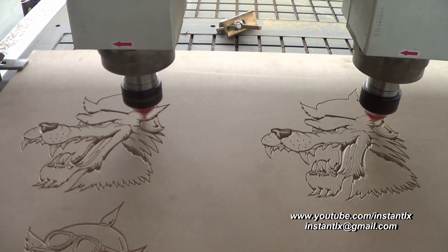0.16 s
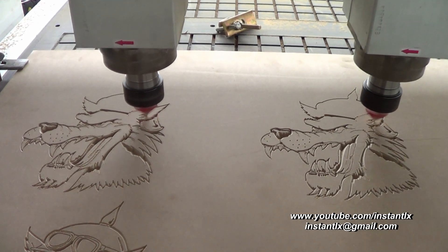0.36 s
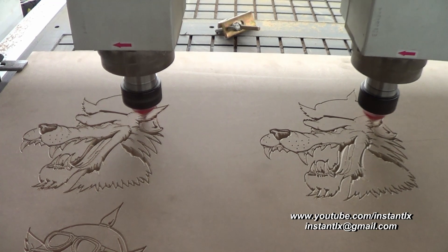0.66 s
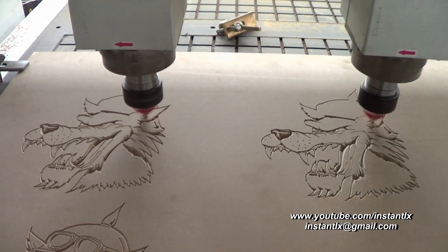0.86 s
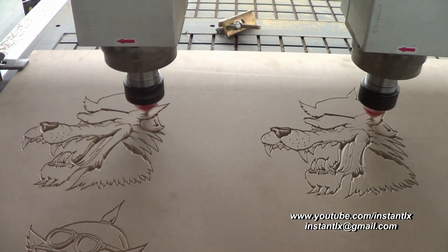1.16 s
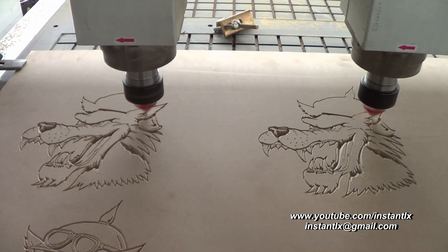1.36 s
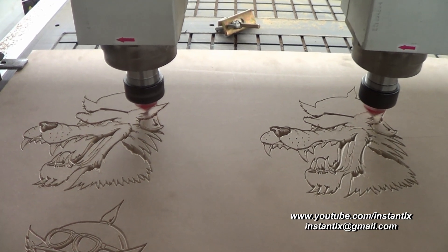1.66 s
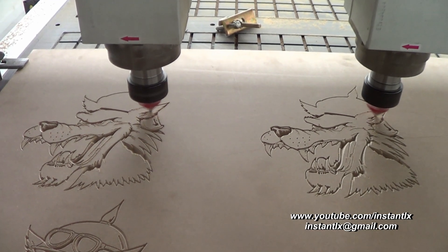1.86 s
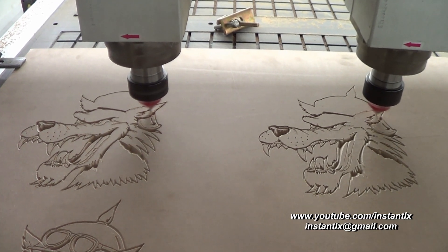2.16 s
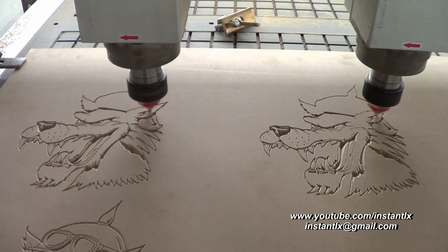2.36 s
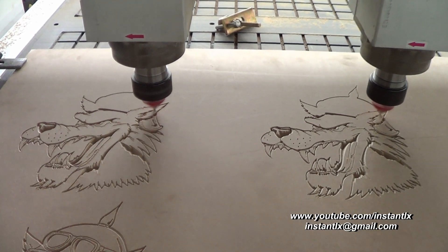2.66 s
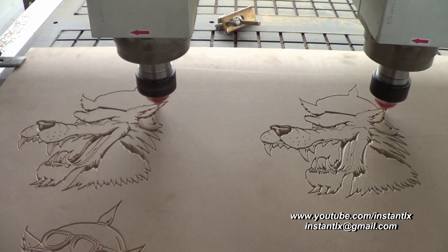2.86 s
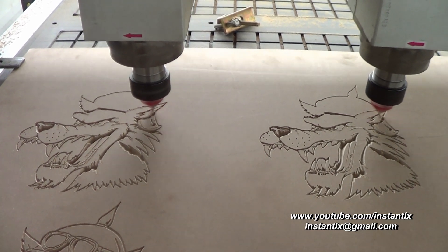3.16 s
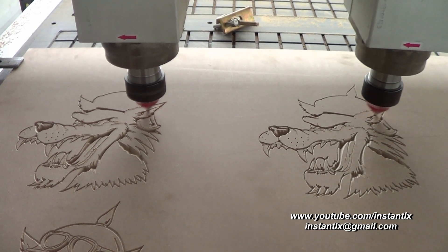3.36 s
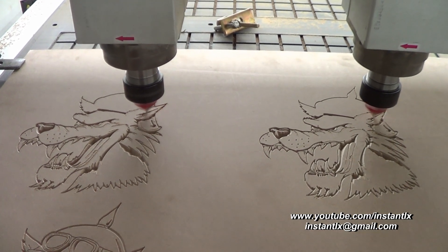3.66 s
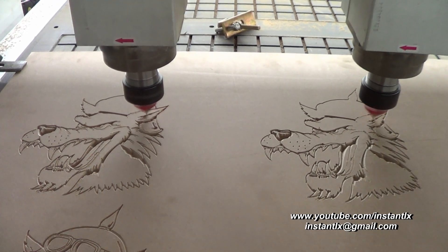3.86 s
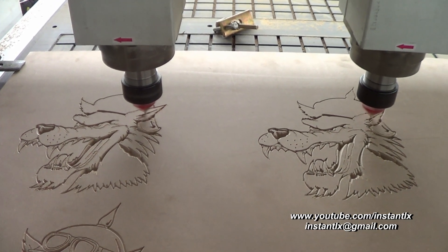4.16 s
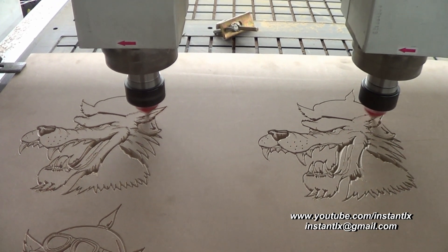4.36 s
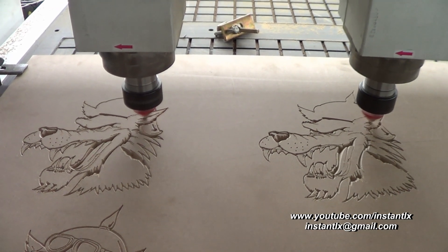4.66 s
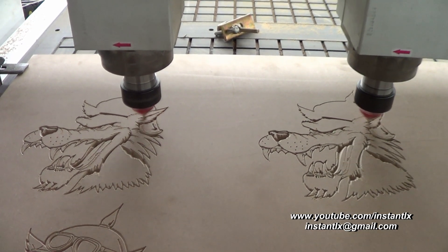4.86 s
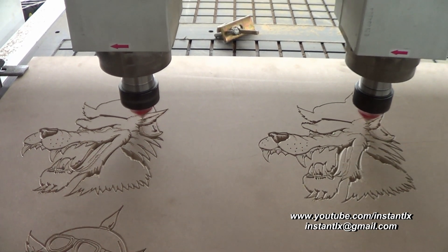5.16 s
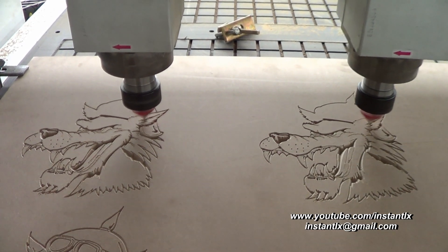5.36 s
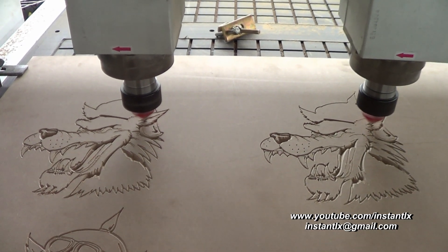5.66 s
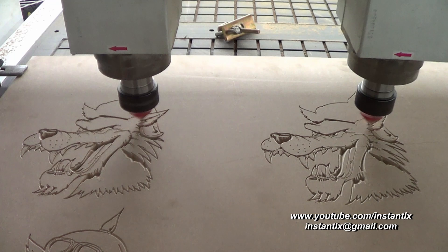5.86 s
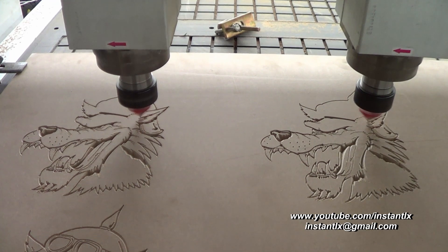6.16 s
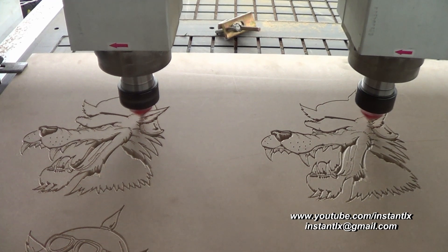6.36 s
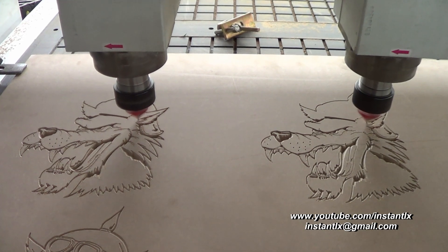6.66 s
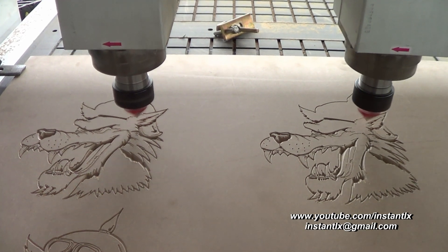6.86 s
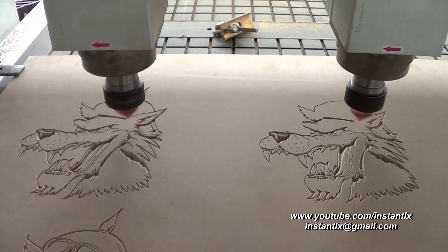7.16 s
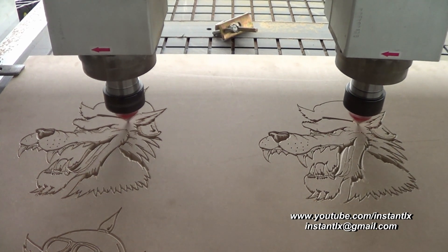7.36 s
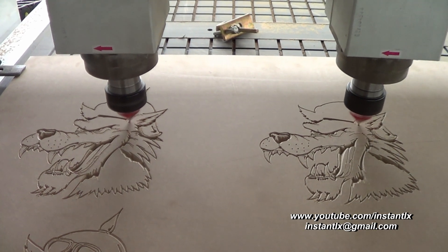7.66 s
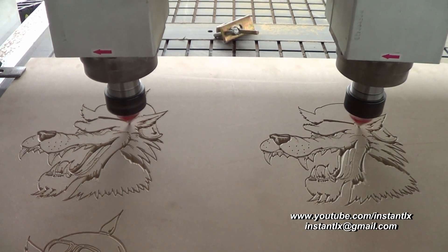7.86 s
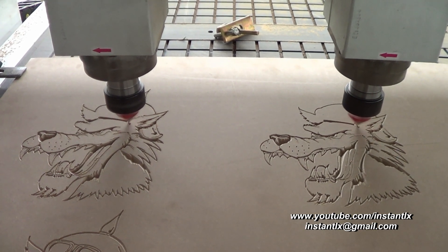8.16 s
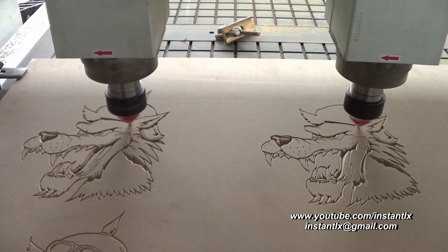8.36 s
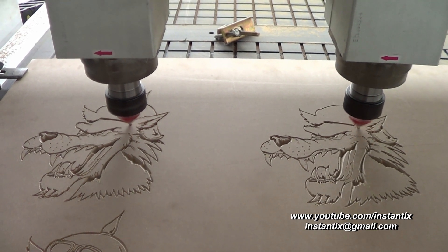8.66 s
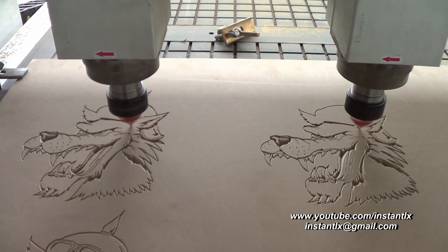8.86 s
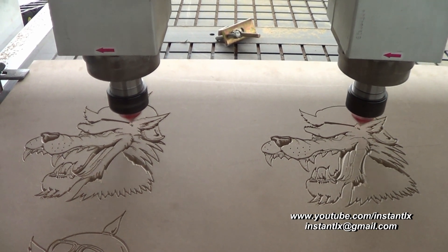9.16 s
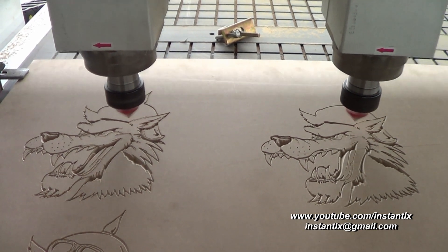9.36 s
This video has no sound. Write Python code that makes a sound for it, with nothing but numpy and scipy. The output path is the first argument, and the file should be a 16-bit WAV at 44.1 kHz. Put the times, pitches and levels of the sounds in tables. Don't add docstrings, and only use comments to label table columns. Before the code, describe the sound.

Steady loud airy rush from twin carving-machine spindles with wavering whine and faint low hum; the sound cuts out briefly near the start.

```python
import sys
import numpy as np
from scipy import signal
from scipy.fft import rfft, irfft
from scipy.io import wavfile
from scipy.ndimage import uniform_filter1d

SR = 44100
rng = np.random.default_rng(int(sys.argv[2]) if len(sys.argv) > 2 else 0)


def invert_db(x):
    u = np.asarray(x, float) / 20
    return 10 ** u


def store_pcm(level_fs):
    pcm = np.round(np.clip(level_fs, -1, 1) * 32767).astype(np.int16)
    wavfile.write(sys.argv[1], SR, np.atleast_2d(pcm).T)


N = 418950
T = np.arange(N) / SR
COARSE_T = T[::441]
HZ = np.fft.rfftfreq(2048, 1 / SR)
FRAMES = N // 512 + 5
FRAME_T = np.arange(FRAMES) * 512 / SR

SHAFTS_HZ = 299.76, 299.85
SLOT_HZ = 6595.16, 6596.98
DRIVE_HZ = 3400.14
SLOT_DB, DRIVE_DB = -39, -38.5
RUSH_DB, WASH_DB, HUM_DB = -16.5, -26, -46.0
IN_STEP_S = 5.19
GAP_S = .6195, 1.1735
CREEP_DB_PER_S, LEAN_DB_PER_S = -0.03, 0.12

# (frequency [Hz], density [dB/Hz])
BLOWER_SPECTRUM = [(20, -24), (60, -18), (100, -3), (122, 0), (133, -4), (146, -13), (172, -15), (197, -4),
                   (215, -13), (245, -9), (290, -14), (400, -40)]
# (middle [s], length [s], change [dB])
BLOWER_SURGES = [(.35, .3, 4), (2.45, .12, -5), (2.9, .15, -7), (3.22, .15, -5), (3.88, 0.21, -2),
                 (4.25, .45, 3), (4.7, .2, -4), (5.38, .22, 4), (5.9, .25, 1), (6.2, .15, 2),
                 (6.95, 0.24, 5), (7.42, .35, -4.5), (7.85, 0.46, 4), (8.65, .4, 4.5), (9.0, .15, -7),
                 (9.27, .2, 5)]
# (frequency [Hz], density [dB/Hz])
WASH_SPECTRUM = [(40, -34), (165, -23), (280, -14), (500, -4.5), (1200, 0), (2500, -0.5), (5000, 0),
                 (8000, -2), (9400, -7), (11000, -16)]
# (frequency [Hz], density [dB/Hz])
RUSH_SPECTRUM = [(40, -45.5), (165, -27), (270, -13), (400, -12.5), (490, -8.5), (1500, -5.5), (3000, -4),
                 (5500, -3), (7000, -4), (8200, -4.5), (9400, -11.5), (10300, -9), (11000, -16.5)]
# (centre [Hz], width [Hz], gain [dB])
HOUSING_BANDS = [(553, 87, 7.5), (716, 148, 8.5), (858, 113, 5), (1005, 155, 7), (1313, 100, -2),
                 (1617, 45, 4.5), (1790, 160, 6), (2126, 53, 5), (2187, 130, 1), (2417, 215, 8),
                 (3093, 303, 8), (3360, 120, 5), (3736, 440, 3.5), (4680, 540, 6), (7080, 350, 2),
                 (7450, 250, 1.5), (910, 37, -3), (1456, 58, -5.5), (1581, 57, -8), (1703, 43, -3.5),
                 (2060, 92, -1.5), (2783, 160, -5.5), (4414, 235, -8), (6470, 150, -2), (7240, 170, -3.5)]
# (middle [s], length [s], change [dB])
ECHO_SWINGS = [
    (2.4, .3, 1),
    (3.0, .2, 1),
    (6.88, .2, 2),
    (7.18, .35, -3.5),
    (9.35, .3, -2),
]
# (frequency [Hz], left minus right [dB])
PORT_LEAN = [(150, 6), (400, -2), (600, -1.5), (1000, -2), (1250, -7), (1700, 0), (2300, -5), (3300, -2.5),
             (4400, -1.7), (5500, -1), (6600, -3), (7500, 4.5), (8200, -1), (11000, 0.8)]
# (frequency [Hz], left leads by [rad])
PORT_LEAD = [(0, 0), (520, 0.5), (1120, 0.2), (1380, 0.3), (2330, 0.1), (3360, 0.46), (3960, 0.3),
             (6800, 0.2), (11200, 0.4)]
# (multiple [-], first spindle [dB], second spindle [dB], left minus right [dB])
STEADY_ORDERS = [(4, -56, -56, 7), (5, -52, -58, -1.1), (8, -48, -51, -3), (12, -44.5, -45.5, -1.5),
                 (18, -47.5, -52, -2.5)]
# (multiple [-], level [dB], weaker spindle's share [0-1], in step at [s])
BEATING_ORDERS = [
    (1, -39.5, 0.68, 10.2),
    (6, -38.5, 0.38, 7.31),
    (2, -42, .2, 6.3),
]
# (middle [s], length [s], first [dB], second [dB], sixth order [dB])
BITES_DB = [(.2, 0.24, -2.5, 8, 1), (.47, 0.16, -2, 8.5, 0), (1.4, .25, -2, -5, -7), (1.66, .15, -8, 0, 0),
            (2.0, .3, 3.5, 4.5, 0), (2.5, .2, -7.5, 0, -4), (2.86, 0.27, 11, 1, 5), (3.4, 0.59, 4, 2, -1),
            (3.7, 0.071, -5, 0, -8), (3.84, .14, 8, 4, -2), (3.99, .08, -10, 0, 0), (4.25, .1, -9, 4, 0),
            (4.4, .15, 3, -3, 0), (4.75, .25, 5.5, -1, -4), (5.06, 0.093, -2, 4, 4),
            (5.42, .15, 2.5, -4, -9), (6.05, .2, -3, 4, 3), (6.25, .2, 3, -7, 0), (6.65, 0.26, 1, 7, 3),
            (7.15, 0.4, 2.5, -8, -1), (7.38, .15, 0, -2, 7), (7.54, .12, -10, -4, -1),
            (9.0, .4, 0, 5.5, 2.5), (9.38, .25, 0, -5, 5)]
# (time [s], lag [turns of slot whine])
SLOT_LAG = [(0, -0.31), (1.5, -.25), (2.1, -.13), (2.8, .11), (3.33, .11), (3.77, -.09), (5.5, 0.057),
            (6, -.02), (6.63, .13), (7.57, -.16), (8.2, -.02), (8.9, .25), (9.5, .3)]
# (level at edge [dB], reach [s], taper power [-])
GAP_FADES = [
    (-17, .0295, 1.15),
    (-22, .0425, .85),
]


def evened(x):
    return x / np.sqrt(np.mean(x ** 2))


def read(points, hz):
    f, value = np.transpose(points)
    return np.interp(np.log(hz + 1), np.log(f + 1), value)


def drift(rate_hz, t):
    total = 0
    for f in np.geomspace(rate_hz / 10, rate_hz, num=16):
        total = total + np.sin(2 * np.pi * (f * t + rng.random())) / np.sqrt(f)
    return evened(total)


def fine_drift(rate_hz):
    return np.interp(T, COARSE_T, drift(rate_hz, COARSE_T))


def swells(rows, t, axis):
    total = 0
    for row in rows:
        total = total + row[axis] * np.exp(-np.log(16) * ((t - row[0]) / row[1]) ** 2)
    return total


def noise_bins():
    real, imag = rng.standard_normal((FRAMES, len(HZ), 2)).T
    return real + 1j * imag


def sound(z):
    return evened(signal.istft(z, nperseg=2048, noverlap=1536)[1][..., :N])


def housing_db(t):
    total = 0
    for hz, width_hz, db in HOUSING_BANDS:
        centre_hz = hz * (1 + 0.0051 * drift(1.19, t))
        off = (HZ[:, None] - centre_hz) / (width_hz / 2)
        total = total + db * (1 + .13 * drift(1.5, t)) * np.exp(-np.log(2) * off ** 2)
    echo_db = CREEP_DB_PER_S * (t - t.mean()) + swells(ECHO_SWINGS, t, axis=2)
    echo_band = np.exp(-((HZ[:, None] - 6250) / 330) ** 2)
    return total + echo_db * echo_band


def blower():
    near, far = rng.standard_normal((2, N))
    ports = np.array([near, 0.55 * near + 0.79 * far])
    colour = invert_db(read(BLOWER_SPECTRUM, np.fft.rfftfreq(N, 1 / SR)))
    hum = evened(irfft(rfft(ports) * colour, N))
    port_db = HUM_DB + np.array([[2.5], [-3]])
    return hum * invert_db(port_db + swells(BLOWER_SURGES, T, axis=2) + 1.6 * fine_drift(9))


def workshop():
    colour_db = read(WASH_SPECTRUM, HZ)[:, None] + .45 * housing_db(FRAME_T)
    return invert_db(WASH_DB) * sound(np.array([noise_bins(), noise_bins()]) * invert_db(colour_db))


def fans():
    gusts = invert_db(0.68 * evened(uniform_filter1d(rng.standard_normal(N + 4096), size=120)))
    rush = gusts * rng.standard_normal(N + 4096)
    air = signal.stft(rush, nperseg=2048, noverlap=1536)[2][:, :FRAMES]
    colour_db = read(RUSH_SPECTRUM, HZ)[:, None] + 0.47 * drift(5.4, FRAME_T) + housing_db(FRAME_T)
    side = np.array([.5, -.5])[:, None, None]
    lean_db = read(PORT_LEAN, HZ)[:, None] + LEAN_DB_PER_S * (FRAME_T - FRAME_T.mean())
    ports = invert_db(side * lean_db) * np.exp(1j * side * read(PORT_LEAD, HZ)[:, None])
    return invert_db(RUSH_DB) * sound(air * invert_db(colour_db) * ports)


def tone(hz, db, lean_db, wobble_db=2.0, slip_rad=0.21, behind_turns=0):
    slip = slip_rad * np.repeat(drift(1.5, COARSE_T), 441)[:N]
    phase = 2 * np.pi * (hz * (T - IN_STEP_S) - behind_turns) + slip
    level = invert_db(db + wobble_db * fine_drift(3))
    side = np.array([[.5], [-.5]])
    return np.sqrt(2) * level * invert_db(side * lean_db) * np.cos(phase + side * read(PORT_LEAD, hz))


def beat_db(k, db, share, in_step_s):
    beat_hz = k * (SHAFTS_HZ[1] - SHAFTS_HZ[0])
    both = 1 + share * np.exp(2j * np.pi * beat_hz * (T - in_step_s))
    return db + 20 * np.log10(abs(both) + 1e-3)


def drive():
    return tone(DRIVE_HZ, DRIVE_DB, -6)


def slots():
    lag = np.interp(T, *np.transpose(SLOT_LAG))
    first = tone(SLOT_HZ[0], SLOT_DB, -3, wobble_db=1.2, slip_rad=.04)
    second = tone(SLOT_HZ[1], SLOT_DB, -3, wobble_db=1.2, slip_rad=.04, behind_turns=lag)
    return first + second


def shafts():
    first_db, sixth_db, second_db = (beat_db(*row) for row in BEATING_ORDERS)
    first_db = first_db + swells(BITES_DB, T, axis=2)
    second_db = second_db + swells(BITES_DB, T, axis=3)
    sixth_db = sixth_db + swells(BITES_DB, T, axis=4)
    out = tone(SHAFTS_HZ[0], first_db, 2.5, wobble_db=0.5)
    out += tone(2 * SHAFTS_HZ[0], second_db, -2.2, wobble_db=1.5, slip_rad=.35)
    out += tone(6 * SHAFTS_HZ[0], sixth_db, -2.5, wobble_db=3.0)
    for k, a_db, b_db, lean_db in STEADY_ORDERS:
        out += tone(k * SHAFTS_HZ[0], a_db, lean_db, wobble_db=4.5)
        out += tone(k * SHAFTS_HZ[1], b_db, lean_db, wobble_db=2.5)
    return out


def scene():
    return blower() + workshop() + fans() + drive() + slots() + shafts()


def edge_fade(depth_s, db, reach_s, power):
    return invert_db(db) * np.clip(1 - depth_s / reach_s, 0, 1) ** power


def dropout_gain():
    stop_s, return_s = GAP_S
    outside = (T < stop_s) | (T > return_s)
    open_share = uniform_filter1d(outside * 1., size=40)
    tail = edge_fade(T - stop_s, *GAP_FADES[0]) * (T < return_s)
    head = edge_fade(return_s - T, *GAP_FADES[1]) * (T > stop_s)
    return np.maximum(open_share, tail + head)


def top_cut(x):
    return signal.sosfilt(signal.butter(12, 11620, fs=SR, output="sos"), x)


def record(dry):
    squeezed = .9 * np.tanh(dry / .9)
    band_limit = signal.firwin(2047, 10515, window=("kaiser", 11), fs=SR)
    mix = dropout_gain() * signal.oaconvolve(squeezed, band_limit[None], "same")
    return top_cut(mix)


dry = scene()
out = record(dry)
store_pcm(out)
```